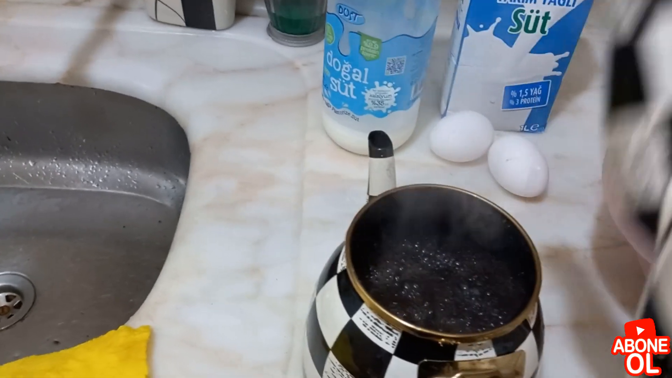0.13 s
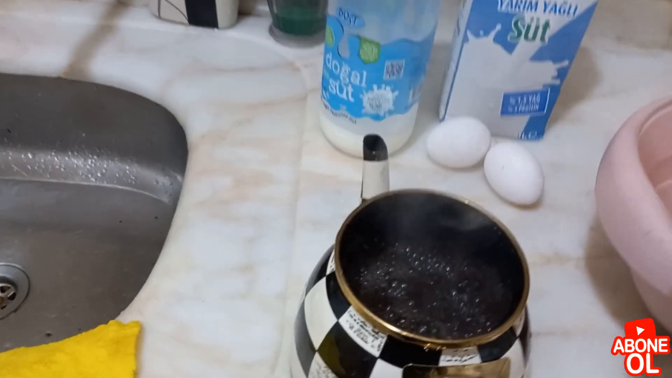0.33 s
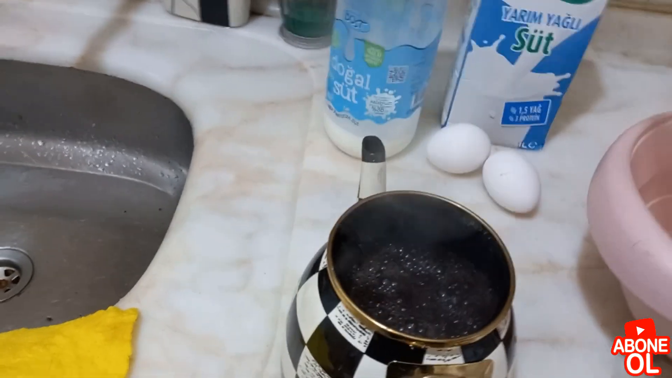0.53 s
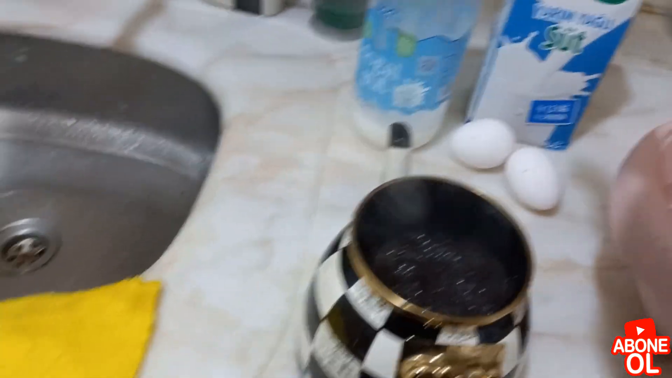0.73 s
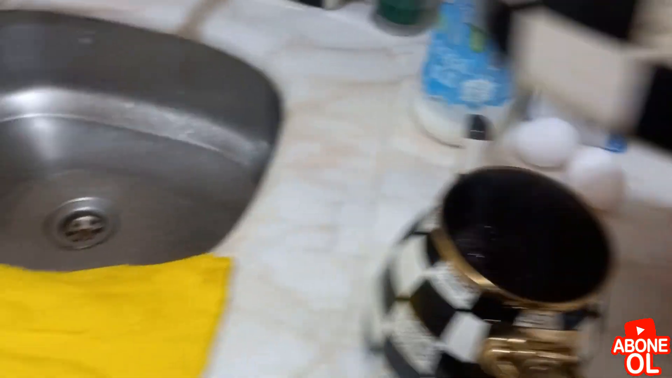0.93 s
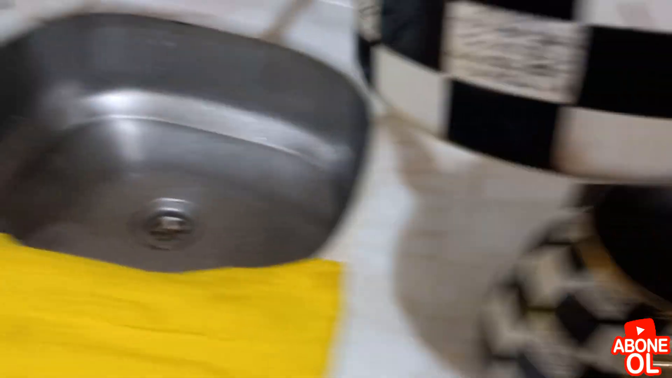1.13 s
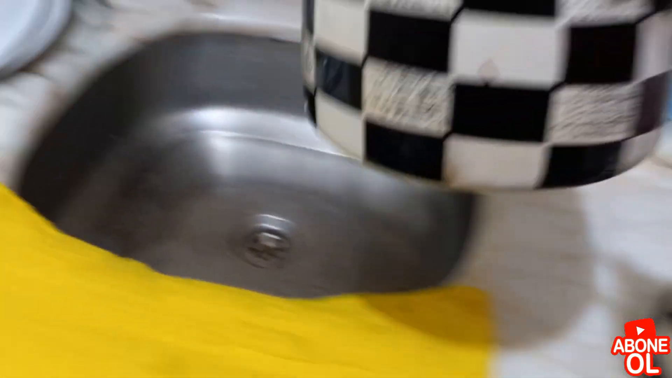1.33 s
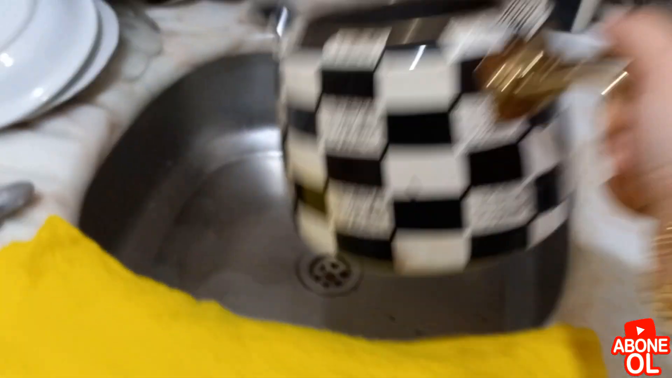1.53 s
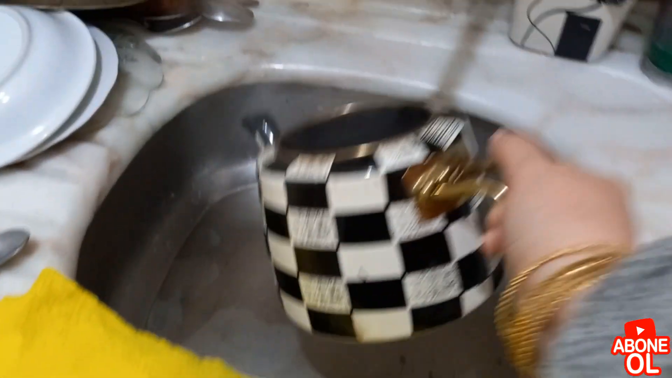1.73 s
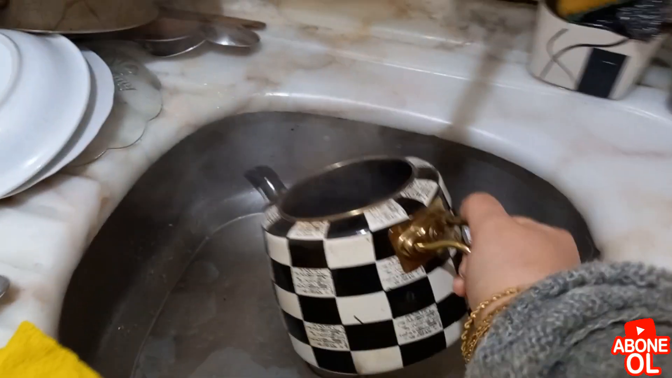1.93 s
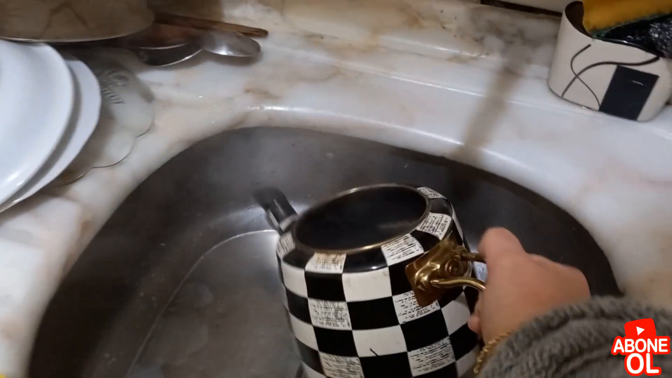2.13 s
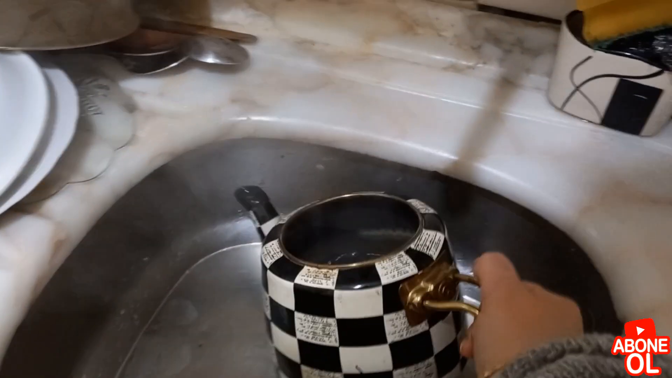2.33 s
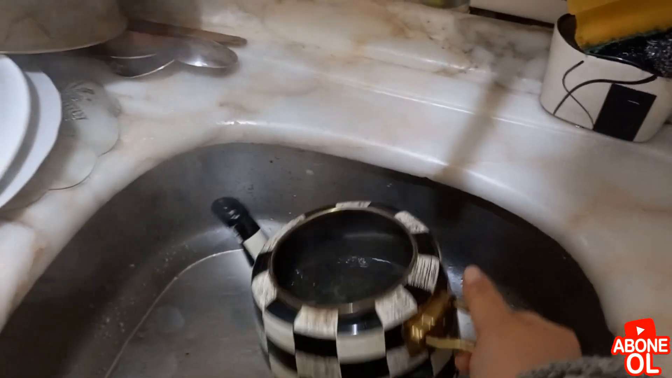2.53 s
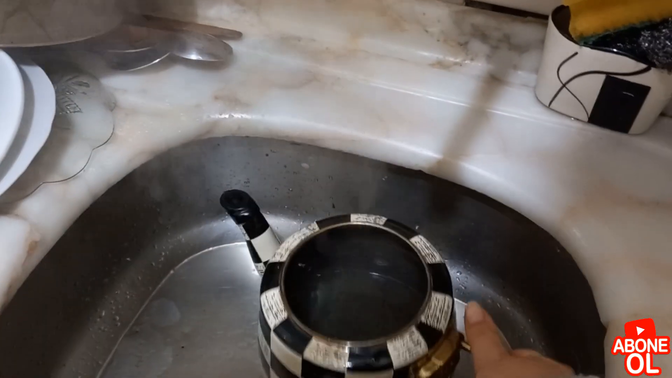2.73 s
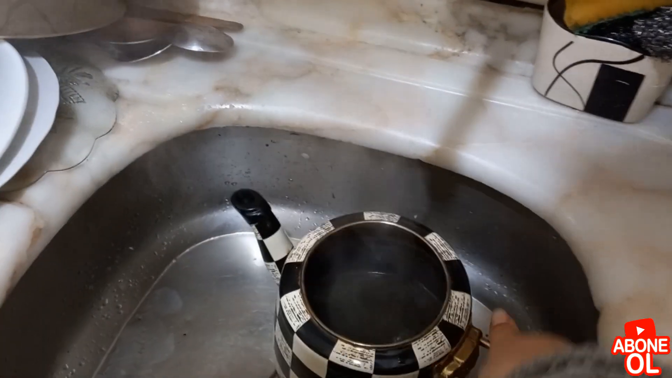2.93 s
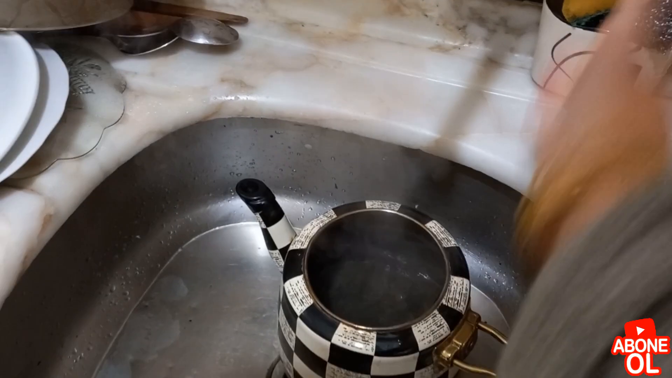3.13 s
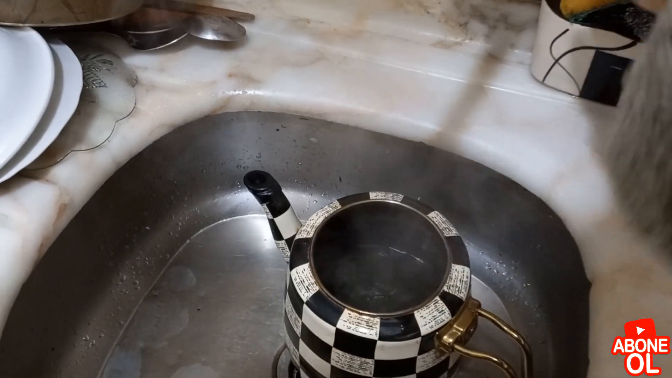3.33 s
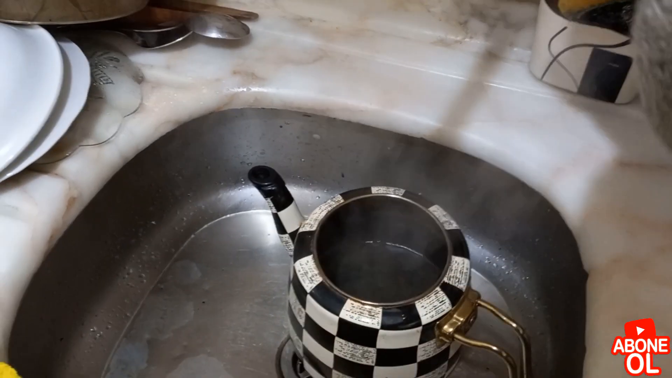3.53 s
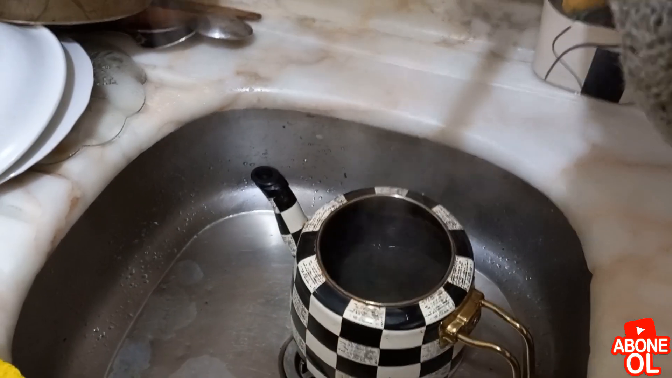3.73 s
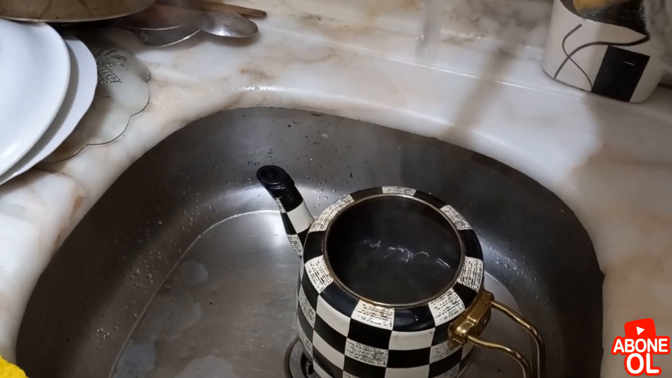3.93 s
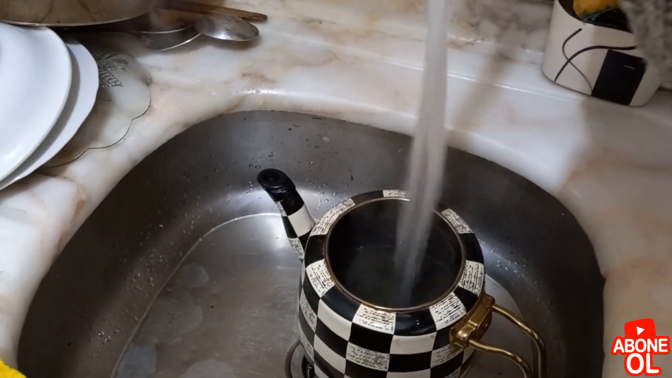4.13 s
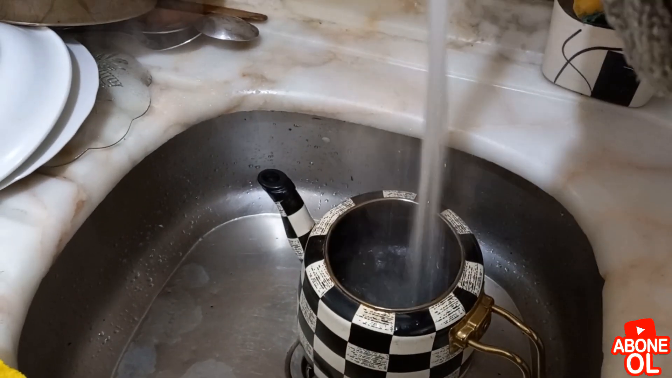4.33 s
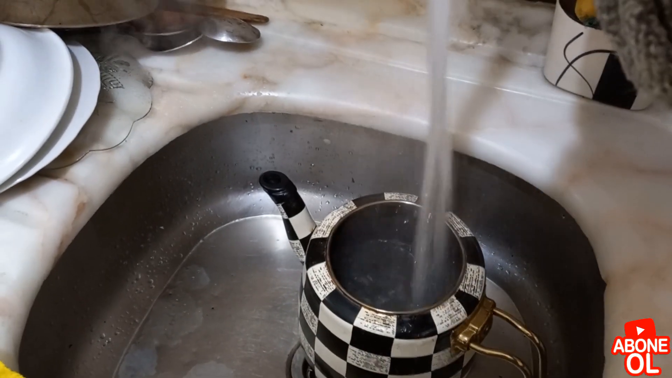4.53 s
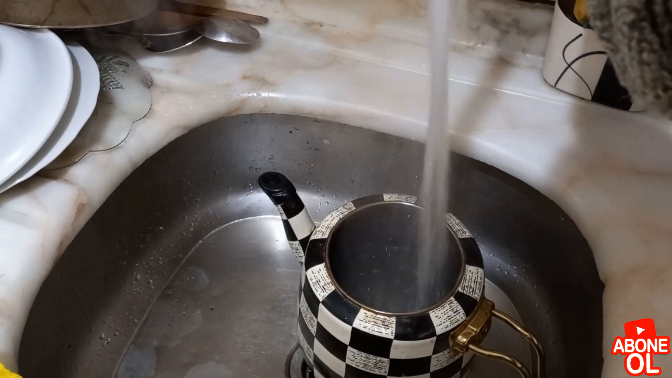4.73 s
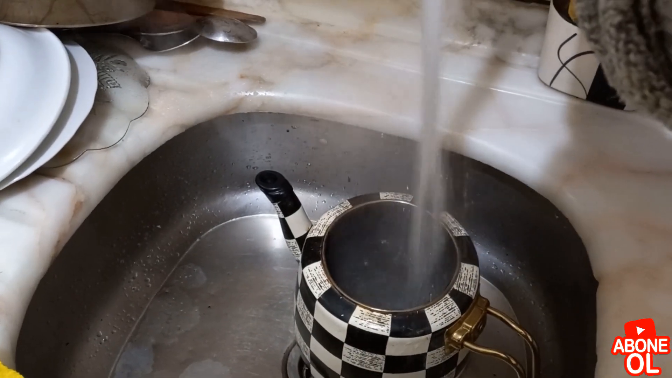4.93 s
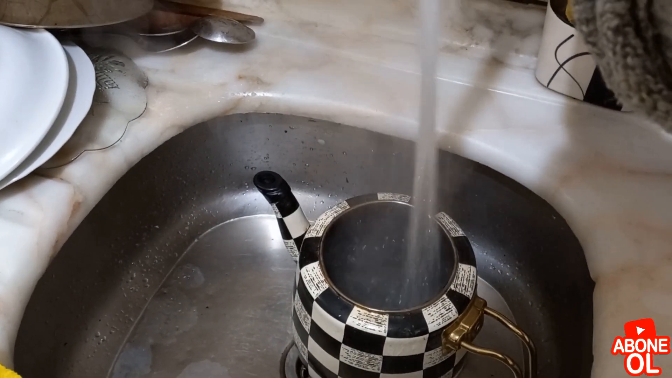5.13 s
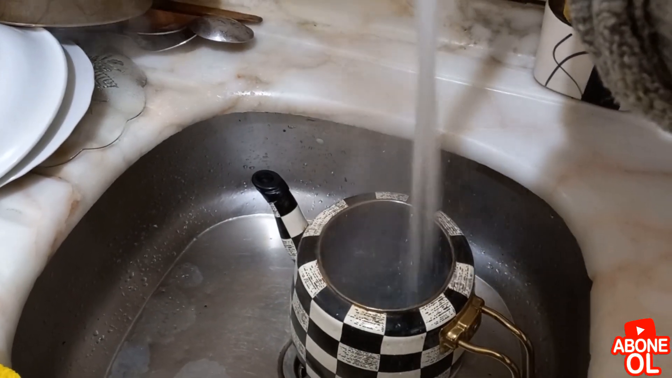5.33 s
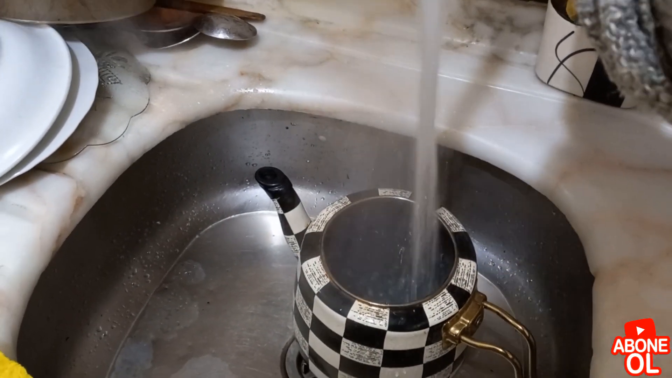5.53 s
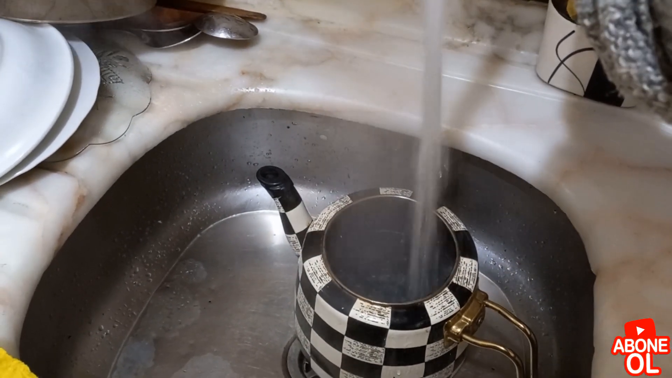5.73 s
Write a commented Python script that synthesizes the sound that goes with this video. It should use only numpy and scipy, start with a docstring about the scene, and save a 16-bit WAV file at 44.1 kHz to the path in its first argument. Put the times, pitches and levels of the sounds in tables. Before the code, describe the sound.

Heard from close by in a kitchen, faint handling ticks and a sleeve's rustle sit over a steady low fridge hum. A metal kettle bangs twice against a steel basin in quick succession, then clatters, thumps and clinks as it is settled. For the last third, a jet from the tap pours into the kettle, splashing and bubbling with a few plops and a hollow boom, still running at the end.

```python
"""Filling a kettle at a steel sink

An enamel kettle is carried to the sink, knocked down twice, settled and filled from the tap. Impacts
excite the damped modes of handle and basin. The jet hisses, splashes and entrains bubbles that boom in
the kettle's resonances. A fridge motor hums and whines behind. The two microphone ports of a hand-held
phone hear the bass alike and the treble differently."""
import sys
import numpy as np
from scipy import signal
from scipy.fft import rfft, irfft, next_fast_len
from scipy.io import wavfile

SR = 44100
rng = np.random.default_rng(int(sys.argv[2]) if len(sys.argv) > 2 else 0)


def master(y):
    """Save y as 16-bit WAV."""
    cut = np.clip(np.atleast_2d(y).T, -1, 1)
    pcm = np.round(cut * 32767)  # scale
    wavfile.write(sys.argv[1], SR, pcm.astype(np.int16))


N = 259749
T = np.arange(N) / SR
EVENT_T = T[:SR // 2]  # time axis of one short event
SIZE = next_fast_len(N)
F = np.maximum(np.arange(SIZE // 2 + 1) * SR / SIZE, 1)
BANDS = 30 * 2 ** (np.arange(20) / 2)  # half-octave centres [Hz]


def undb(db):
    """Amplitude ratio of a level in decibels."""
    return 10 ** (np.asarray(db) / 20)


def curves(table):
    """Linear interpolation of each column over time."""
    s, *columns = np.transpose(table)
    return [np.interp(T, s, column) for column in columns]


def over_hz(table, column=1):
    """Interpolation of one column over log frequency."""
    rows = np.array(table, float)
    return np.interp(np.log(F), np.log(rows[:, 0]), rows[:, column])


def walk(rate):
    """Random modulation: values 1 / rate s apart, joined by straight lines; spread near 1."""
    knots = rng.standard_normal(int(T[-1] * rate) + 2)
    return 1.2 * np.interp(T * rate, np.arange(len(knots)), knots)


def flicker(bands, shared_db, own_db, rate):
    """Amplitude modulation: the summed bands swell slowly together and flicker alone."""
    swell = shared_db * walk(rate / 4)
    return sum(band * undb(swell + own_db * walk(rate)) for band in bands)


def resonances(peaks):
    """Frequency response of Lorentzian peaks (frequency [Hz], width [Hz], gain [dB])."""
    return undb(sum(db / (1 + (2 * (F - hz) / width) ** 2) for hz, width, db in peaks))


def mode(force, hz, t60):
    """Damped oscillator: each impulse starts a decaying sine."""
    pole = np.exp(2j * np.pi * hz / SR - np.log(1000) / (t60 * SR))
    return signal.lfilter([1], [1, -pole], force).imag


LEFT_LEAD_S = .00015
# sound field at the two ports: (frequency [Hz], correlation, left minus right [dB])
PORTS = [(60, 0.95, 3.5), (250, 0.92, 1.7), (500, 0.71, 2), (970, 0.11, 1), (2000, 0.093, -0.6),
         (3930, 0.066, 0), (7900, 0.032, 1)]
def noise_bands(gain, drive=1):
    """Partially coherent noise, alike in the bass: bands x 2 x N, adding up to rms 1."""
    mid, side = rfft(rng.standard_normal((2, SIZE)) * drive)
    alike = np.clip(over_hz(PORTS), -1, 1)
    mid, side = gain * mid * np.sqrt(1 + alike), gain * side * np.sqrt(1 - alike)
    pair = np.array([mid + side, mid - side])
    pair /= np.sqrt(np.mean(irfft(pair, SIZE) ** 2))
    share = np.clip(1 - np.abs(2 * np.log2(F / BANDS[:, None])), 0, 1)
    return irfft((share[:, None] * pair).astype(np.complex64), SIZE)[..., :N]


def room(direct, wash_db=-9.5, t60=0.068):
    """Reverberation: a diffuse wash of reflections decays exponentially after the direct sound."""
    t = T[:SR // 3]
    wash = rng.standard_normal((2, len(t))) * undb(-60 * t / t60) * (t > .003)
    highpass = signal.butter(2, 350, "high", fs=SR, output="sos")
    wash = wash[0] + signal.sosfilt(highpass, wash - wash[0])  # both ports share the bass
    wash *= undb(wash_db) / np.sqrt(np.sum(wash ** 2, axis=1, keepdims=True))
    return direct + signal.fftconvolve(direct[None], wash, axes=1)[:, :N]


# mains hum as the phone moves about: (time [s], level [dB])
HUM_LEVEL = [(0, -38.5), (.6, -41.5), (1.1, -41.5), (1.6, -40.5), (3.0, -37.5), (3.8, -40.5), (4.4, -37.5),
             (5.4, -39.5), (5.89, -40)]
def mains_hum(hz=100.06):
    """Harmonic vibration: a wavering tone and its octave, which drops as the phone swings to the sink."""
    level_db, = curves(HUM_LEVEL)
    swing = np.clip((T - 0.67) / 0.77, 0, 1)
    phase = 2 * np.pi * hz * T
    fundamental = np.sin(phase) * undb(level_db + 2.2 * walk(12))
    octave = np.sin(2 * phase) * undb(-42.5 - 10 * swing + 3.4 * walk(6.6))
    return np.sqrt(2) * (fundamental + octave)


# rumble of cabinet and pipe: (frequency [Hz], relative spectral density [dB])
RUMBLE_SPECTRUM = [(30, -44), (55, -21), (80, -13), (130, -5.5), (165, -1.5), (200, -8), (270, -4),
                   (500, -15.5), (800, -27.5), (1050, -32), (1700, -38), (4100, -45), (5600, -40),
                   (7500, -41.5), (8300, -49.5), (16000, -45.5)]
def rumble():
    """Random vibration: bands of noise, strongest in the bass."""
    return noise_bands(undb(over_hz(RUMBLE_SPECTRUM)))


SHAFT_ORDERS = [22, 21, 41, 47, 49, 51, 52, 59, 69, 70, 71, 73, 97, 98, 102, 126, 137, 150]
# motor whine, a row per shaft order: (relative line level [dB], relative noise hump level [dB])
WHINE_LINES = [(-15.5, -17), (-13, -12), (-19, -17), (-13, -16), (-17, -19), (-6.5, -11.5), (-18, -20),
               (-21, -9.5), (-20, -20), (-4.5, -8.5), (-15, -16), (-20, -28), (-12.5, -20), (-17, -20),
               (-16, -25), (-21, -13.5), (-14.5, -14), (-19, -18)]
def motor_whine(shaft_hz=49.295, hump_width_hz=260):
    """Rotational harmonics: lines at multiples of the shaft rate, each on a hump of noise."""
    power = sum(undb(2 * hump_db) / (1 + (2 * (F - order * shaft_hz) / hump_width_hz) ** 4)
                for order, (_, hump_db) in zip(SHAFT_ORDERS, WHINE_LINES))
    whine = noise_bands(np.sqrt(power)).sum(0) * undb(-2 + 1.2 * walk(5))
    for order, (db, _) in zip(SHAFT_ORDERS, WHINE_LINES):
        omega = 2 * np.pi * order * shaft_hz
        phase = omega * T + 0.005 * order * walk(17)
        port_shift = omega * LEFT_LEAD_S + 1.1 * rng.standard_normal()
        if order == SHAFT_ORDERS[0]:  # this line starts strong and fades during the swing
            db = db + 8.5 - 13 / (1 + np.exp((1.12 - T) / .08))
        whine += np.sin([phase, phase + port_shift]) * undb(db + 2.6 * walk(7))
    return whine


def fridge(cabinet_db=-42, whine_db=-59):
    """Machine noise: tonal hum and whine over the broadband rumble of the cabinet."""
    hum = mains_hum()
    cabinet = flicker(rumble(), shared_db=0.78, own_db=0.22, rate=8.65)
    return hum + cabinet * undb(cabinet_db) + motor_whine() * undb(whine_db)


# short rustles of sleeve and slippers, the kettle's low settling rumble, room tails after the knocks:
# (peak time [s], level [dB], centre [Hz], width [octaves], half length [s])
SOFT_SOUNDS = [(0.77, -50.5, 2760, 1.4, 0.039), (1.034, -57.5, 3040, 2.1, 0.042),
               (1.446, -53, 2000, 1.4, 0.032), (1.742, -47.5, 2000, 2.5, 0.059),
               (2.45, -52, 9000, 1.2, 0.066), (2.51, -52, 2000, 0.71, 0.27), (2.64, -42, 250, 0.96, 0.42),
               (3.063, -53.5, 1820, 0.81, 0.14), (3.41, -56.5, 1760, 1.8, 0.54)]
def swells():
    """Gaussian envelopes: yields (start, envelope, centre, width) of noises that swell and fade."""
    middle = EVENT_T[-1] / 2
    taper = np.sqrt(np.hanning(len(EVENT_T)))
    for s, db, hz, octaves, half_s in SOFT_SOUNDS:
        swell = np.exp(-((EVENT_T - middle) / half_s) ** 2 / 2)
        yield s - middle, undb(db) * swell * taper, hz, octaves


def thuds(first_gap_s=0.049, shrink=.82, octaves=.45, t60=.23):
    """Damped rocking: the kettle's thuds come sooner, softer and lower; later the tap's pipe knocks once."""
    k = np.arange(4)
    times = 2.901 + first_gap_s * (1 - shrink ** k) / (1 - shrink)
    rocking = zip(times, -24.5 - 4.5 * k, 141 * 0.81 ** k)
    pipe_knock = (4.266, -25, 95)
    return [(s, db, hz, octaves, t60) for s, db, hz in [*rocking, pipe_knock]]


# light impacts of handle, bangles and kettle:
# (time [s], tick level [dB], centre [Hz], width [octaves], t60 [s], ring level [dB])
CONTACTS = [(.037, -42, 7200, 0.26, 0.15, -52), (.038, -45, 950, .28, 0.29, -53),
            (.552, -55, 9500, 0.67, .054, -50), (1.0, -52, 7000, .47, .054, -62),
            (1.025, -51, 6500, .33, .05, -58), (1.316, -62, 13000, .5, .5, -65),
            (1.638, -43, 490, 0.18, 0.28, -32.5), (1.647, -58, 855, .3, .15, -39),
            (1.648, -55, 2190, .54, .12, -63), (2.467, -62, 8560, 1.9, 0.19, -66),
            (2.562, -43.5, 3100, 1.25, 0.25, -47), (2.679, -35, 2700, 1.6, 0.45, -51),
            (2.764, -42, 5400, 4.7, 0.39, -42), (2.775, -56, 2300, .5, 0.28, -42),
            (2.846, -28, 4200, 2.7, 0.42, -36), (3.022, -47, 5040, 2.5, 0.13, -66),
            (3.288, -49.5, 1640, 0.41, 0.63, -47), (3.304, -47, 7000, 0.96, 0.18, -52),
            (3.309, -36.5, 616, 0.84, 0.25, -31.5), (3.334, -36, 380, 0.5, 0.26, -41)]
def impacts():
    """Transients start sharply and decay: yields (start, envelope, centre, width) of ticks and thuds."""
    attack = 1 + 0.43 * np.exp(-EVENT_T / 0.0067)
    for s, db, hz, octaves, t60, *_ in [*CONTACTS, *thuds()]:
        yield s, undb(db - 60 * EVENT_T / t60) * attack, hz, octaves


def handling():
    """Band-limited noise bursts: each impact or swell shapes pink noise in time and frequency."""
    treble_dip = resonances([(8900, 2100, -7.5)])
    bands = noise_bands(treble_dip / np.sqrt(F) * (F > 60))
    out = np.zeros((2, N))
    for s, envelope, hz, octaves in [*impacts(), *swells()]:
        span = slice(int(s * SR), int(s * SR) + len(envelope))
        colour = np.exp(-(np.log2(BANDS / hz) / octaves) ** 2 / 2)
        colour *= np.sqrt(len(BANDS) / np.sum(colour ** 2))
        out[:, span] += envelope * np.tensordot(colour, bands[..., span], 1)
    return out


# modes of kettle and handle: (frequency [Hz], relative level [dB], t60 [s])
HANDLE_MODES = [(426, 0.5, 0.3), (490, 1, 0.11), (724, -2.5, 0.22), (772, -10, 0.17), (940, -16, .2),
                (1290, -8, 0.3), (1780, -5, .15), (2250, 4, 0.4), (3060, -6, .2), (4680, -4, 0.068),
                (5800, -7, .12), (6200, -6, 0.08), (6900, 3, 0.065), (11600, -5, .08)]
def handle_ring():
    """Free vibration: each contact excites the modes near its centre frequency."""
    out, t = np.zeros(N), EVENT_T
    for s, _, centre_hz, _, _, ring_db in CONTACTS:
        for k, (hz, db, t60) in enumerate(HANDLE_MODES):
            coupling = (-1) ** k * np.exp(-(np.log2(hz / centre_hz) / 0.44) ** 2 / 2)
            decay = undb(ring_db + db - 60 * t / t60)
            out[int(s * SR):][:len(t)] += coupling * decay * np.sin(2 * np.pi * hz * t)
    return out


# kettle meets basin, edge first and then flat:
# (time [s], force level [dB], contact corner [Hz], crash level [dB])
KNOCKS = [(2.115, -8, 886, -17), (2.119, -18, 400, -35), (2.276, -11.5, 1500, -15.5),
          (2.289, -24, 900, -41), (2.891, -14, 450, -25), (2.9, -25, 300, -52)]
# dense modes of the crash: (frequency [Hz], relative spectral density [dB])
CRASH_SPECTRUM = [(60, -18.5), (250, -10.5), (620, -17), (800, -27), (1050, -22.5), (2400, -26.5),
                  (5000, -37), (7500, -44.5), (8800, -53), (16000, -54)]
def sink_crash(t60_at_1khz=0.43):
    """Modal overlap: dense modes merge into noise whose treble is damped first."""
    bands = noise_bands(undb(over_hz(CRASH_SPECTRUM)))
    out, t = np.zeros((2, N)), EVENT_T
    attack = 1 - np.exp(-t / 0.00065)
    decay_db = 60 * t / t60_at_1khz * (BANDS[:, None] / 1000) ** 0.21
    for s, _, _, crash_db in KNOCKS:
        span = slice(int(s * SR), int(s * SR) + len(t))
        envelopes = attack * undb(crash_db - decay_db)
        out[:, span] += (bands[..., span] * envelopes[:, None]).sum(0)
    return out


# modes of the basin under the kettle: (frequency [Hz], relative level [dB], t60 [s])
BASIN_MODES = [(105, -6.5, 0.214), (169.2, -10.5, 0.43), (228, 0, 0.27), (242.5, -7.5, 0.34),
               (268.3, -1.5, 0.49), (303, -3, .32), (362, -11.5, .35), (415, -16.5, 0.35), (478, -12.5, .3),
               (570, -23, .4), (630, -8, 0.47), (1072, -13, 0.33), (1217, -17, 0.37), (1840, -8, .25)]
def basin_ring(bounce_s=.018, bounce_db=-13.5):
    """Impact excitation: a soft force pulse and two bounces per knock drive the basin's modes."""
    force, t = np.zeros(N), EVENT_T
    for s, force_db, corner_hz, _ in KNOCKS:
        pulse = t * np.exp(-2 * np.pi * corner_hz * t)
        pulse /= pulse.sum()
        for k in range(3):
            force[int((s + k * bounce_s) * SR):][:len(t)] += undb(force_db + k * bounce_db) * pulse
    return sum((-1) ** k * undb(db) * mode(force, hz, t60) for k, (hz, db, t60) in enumerate(BASIN_MODES))


def bubble(hz, cycles):
    """Bubble resonance: an air pocket pulsates as a damped sine that glides up."""
    turns = np.arange(int(5 * cycles * SR / hz)) * hz / SR
    envelope = (1 - np.exp(-turns)) * np.exp(-turns / cycles)
    return envelope * np.sin(2 * np.pi * turns * (1 + 0.0066 * turns))


# the largest bubbles: (time [s], level [dB], frequency [Hz])
LARGE_BUBBLES = [(4.168, -24, 503), (4.378, -8, 1580), (4.425, -6, 540), (4.855, -7, 554), (4.93, -13, 490),
                 (5.15, -6.5, 536), (5.53, -9, 300), (5.64, -13, 305)]
def plops():
    """Single pulsations: large bubbles stand out from the stream."""
    out = np.zeros(N)
    for s, db, hz in LARGE_BUBBLES:
        plop = bubble(hz, cycles=3.4)
        out[int(s * SR):][:len(plop)] += undb(db) * plop
    return out


TAP_OPENS_S = 3.9
# resonances of the kettle: (frequency [Hz], width [Hz], gain [dB])
KETTLE_RESONANCES = [(300, 61, -1.5), (359.7, 6.4, 9), (472, 62, 7.5), (542, 7.3, 8), (602, 11, 4.5),
                     (1210, 45, -1), (1580, 23, 2), (2718, 40, 8.5), (3106, 58, 4.5), (3823, 76, 7.5),
                     (7080, 110, 5.5)]
def bubbles(centre_hz, octaves, rate, cycles, spread_db):
    """Air entrainment: the jet drags bubbles under at random and the kettle filters them; rms 1."""
    out = np.zeros(N + SR)
    gaps, pitches, sizes = rng.random((2500, 3)).T
    starts = TAP_OPENS_S + np.cumsum(-np.log(gaps)) / rate
    for s, pitch, size in zip(starts[starts < T[-1]], pitches, sizes):
        pulsation = bubble(centre_hz * 2 ** (octaves * (pitch - .5)), cycles)
        out[int(s * SR):][:len(pulsation)] += undb(spread_db * min(-np.log(size), 4)) * pulsation
    out = irfft(resonances(KETTLE_RESONANCES) * rfft(out[:N], SIZE), SIZE)[:N]
    return out / np.sqrt(np.mean(out[int(TAP_OPENS_S * SR):] ** 2))


# hiss of the jet and splash of its droplets: (frequency [Hz], relative spectral density [dB])
HISS_SPECTRUM = [(1180, -31), (2000, -1), (2560, -2), (2770, 0), (3400, -4), (3740, -10.5), (4590, -10.5),
                 (7130, -6), (8290, -11), (11900, -4.5), (15100, -5.5), (16100, -25), (16500, -38)]
SPLASH_SPECTRUM = [(60, -14.5), (150, -9.5), (300, -21), (600, -12.5), (800, -12), (1100, -5.5), (1380, -9),
                   (1600, -6.5), (2400, -10), (4600, -10.5), (8000, -29)]
def spray(crossover_hz=4000, splash_top_hz=5000):
    """Source and filter: droplets roughen the jet's noise, the kettle colours it; gives hiss, splash."""
    kettle = resonances(KETTLE_RESONANCES)
    droplets = undb(np.repeat(rng.exponential(size=SIZE // 64 + 1), 64)[:SIZE])
    hiss_gain = kettle * undb(over_hz(HISS_SPECTRUM)) * (F > crossover_hz)
    splash_gain = kettle * undb(over_hz(SPLASH_SPECTRUM)) / (1 + (F / splash_top_hz) ** 8)
    hiss = flicker(noise_bands(hiss_gain, droplets), shared_db=0.07, own_db=0.73, rate=20)
    splash = flicker(noise_bands(splash_gain, droplets), shared_db=0.43, own_db=1.0, rate=16)
    return hiss, splash


# running tap: (time [s], flow against full flow [dB], boom of the air in the kettle [dB])
TAP_FLOW = [(3.9, -48, -57), (4.02, -14, -54), (4.14, -6, -64), (4.17, -5.5, -36), (4.23, -2, -44),
            (4.29, 0.5, -32), (4.7, 0.6, -23.5), (4.9, 0, -21), (5.2, -1.14, -28), (5.6, -0.53, -26.5),
            (5.89, -1.5, -34)]
def tap(hiss_db=-22, splash_db=-24.5, pipe_db=-36.5, ping_db=-30, gurgle_s=4.16):
    """Flow noise: hiss, splash, pipe rumble and pings grow with the flow; bubbles boom in the kettle."""
    flow_db, boom_db = curves(TAP_FLOW)
    surge = undb(1.3 * flow_db)  # grows more steeply than the hiss
    hiss, splash = spray()
    jet = hiss * undb(hiss_db + flow_db) + splash * undb(splash_db) * surge
    pipe = rumble().sum(0) * undb(pipe_db) * surge
    # the gurgle sets in when water meets water and grows as the kettle fills
    filling = np.clip((T - gurgle_s) / 0.12, 0, 1) * undb(-33 + 4.5 * (T - gurgle_s))
    boom = bubbles(537.6, octaves=0.45, rate=500, cycles=6.2, spread_db=1.8) * undb(boom_db)
    gurgle = bubbles(321.3, octaves=0.895, rate=450, cycles=3.4, spread_db=2.6) * filling
    pings = bubbles(2698, octaves=1.766, rate=220, cycles=7.5, spread_db=2.9) * undb(ping_db) * surge
    return (T > TAP_OPENS_S) * (jet + pipe + room(boom + gurgle + pings + plops()))


def scene():
    """Superposition of all sources, a little louder and earlier at the left port."""
    both = fridge() + sink_crash() + room(basin_ring()) + room(handle_ring()) + handling() + tap()
    lean = undb(over_hz(PORTS, column=2) / 2) * np.exp(1j * np.pi * F * LEFT_LEAD_S)
    return irfft(rfft(both, SIZE) * np.array([lean, 1 / lean]), SIZE)[:, :N]


def record(dry):
    """Band limiting and saturation: the phone drops the deepest bass, clips and cuts the top."""
    highpass = signal.butter(4, 62, "high", fs=SR, output="sos")
    lowpass = signal.ellip(10, .2, 70, 16000, fs=SR, output="sos")
    clipped = np.clip(signal.sosfilt(highpass, dry), -1, 1)
    return signal.sosfilt(lowpass, clipped)


dry = scene()
out = record(dry)
master(out)
```